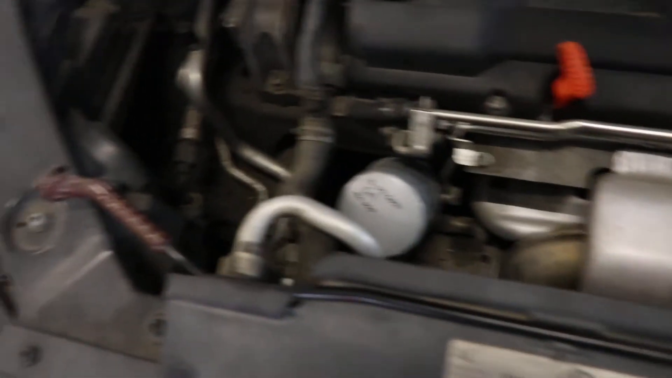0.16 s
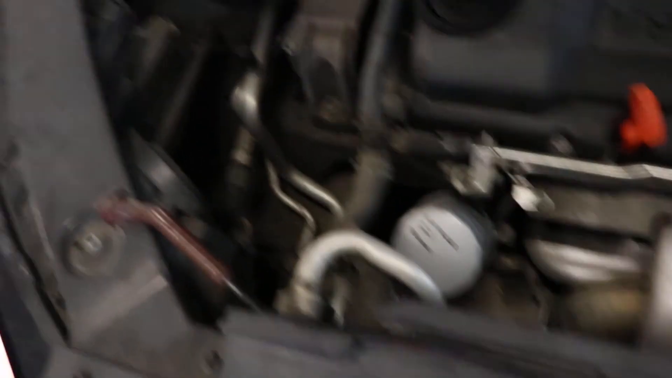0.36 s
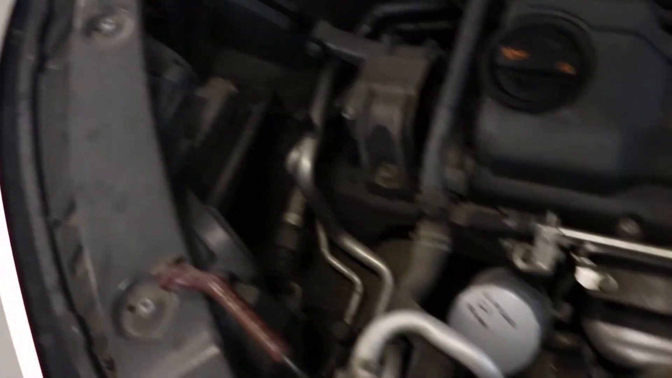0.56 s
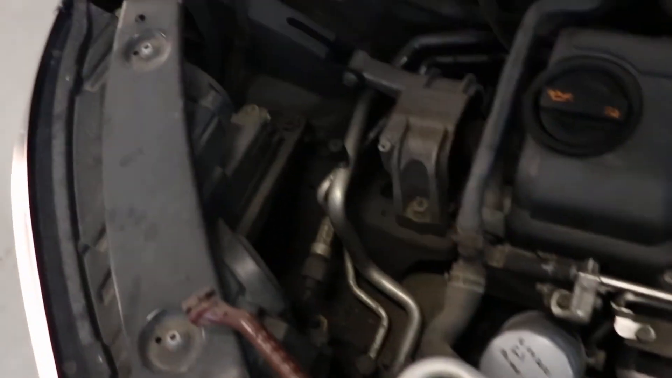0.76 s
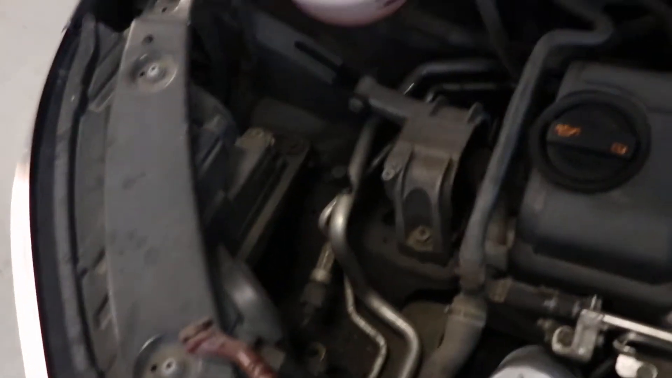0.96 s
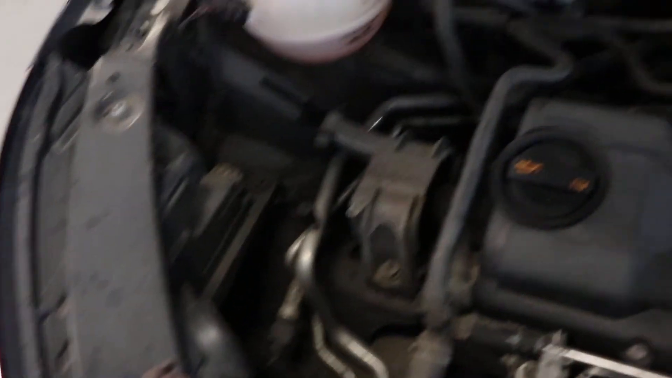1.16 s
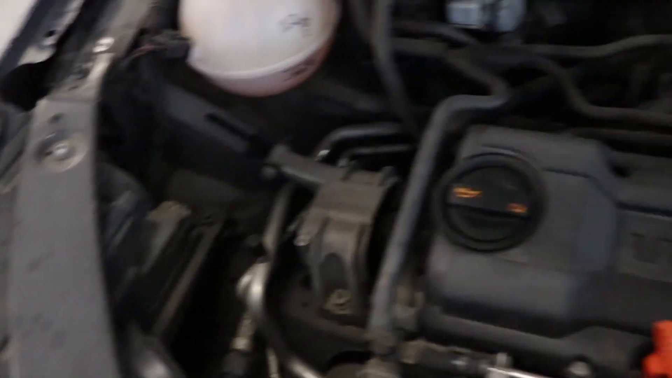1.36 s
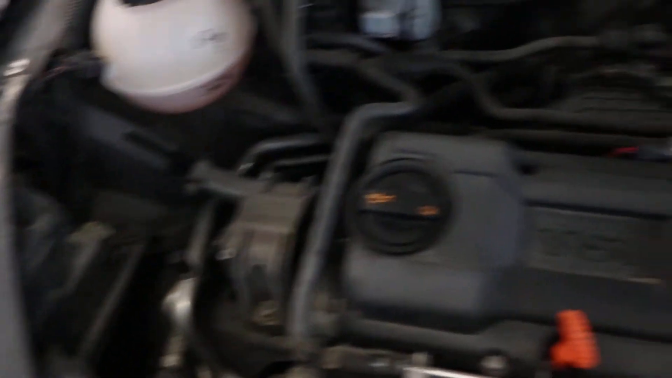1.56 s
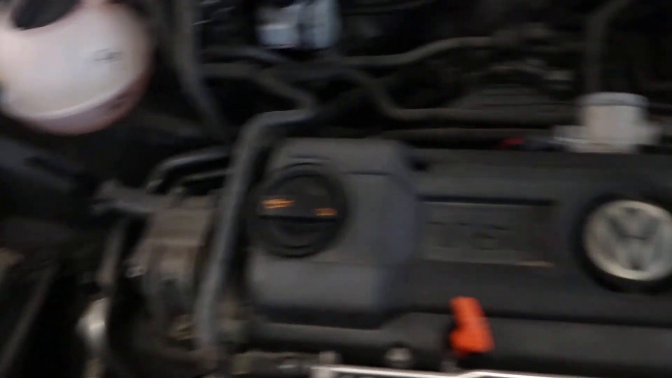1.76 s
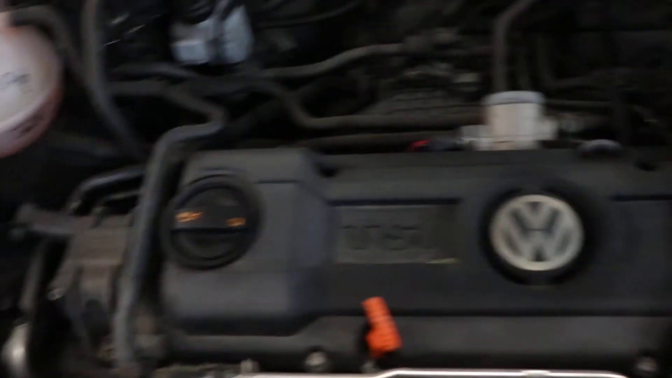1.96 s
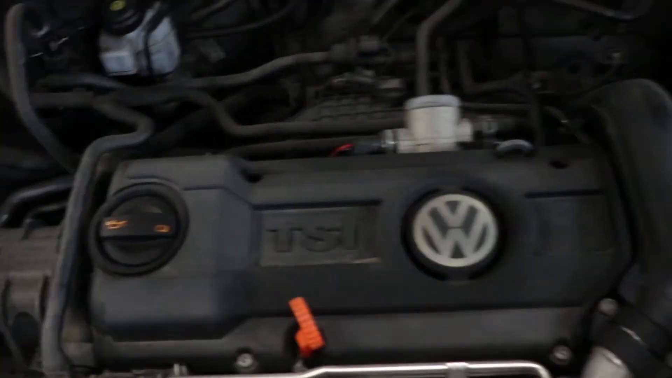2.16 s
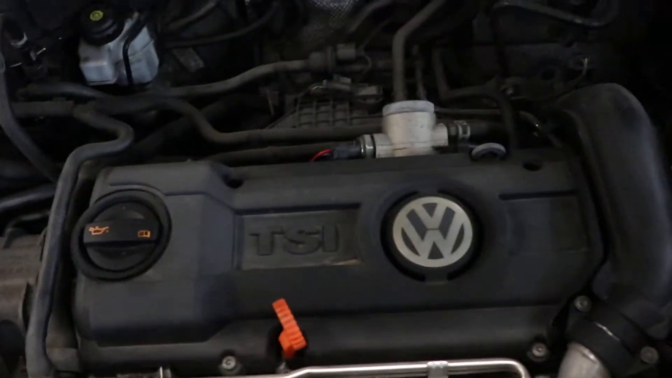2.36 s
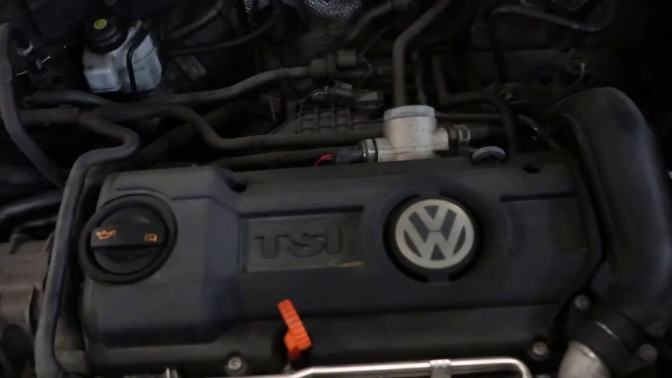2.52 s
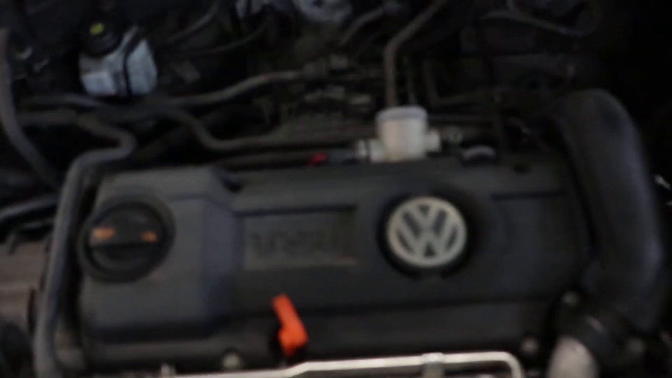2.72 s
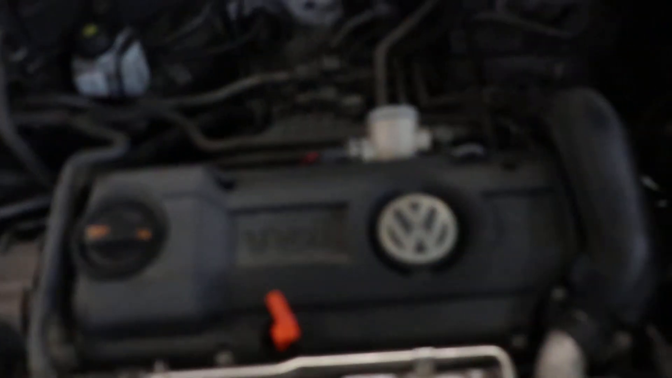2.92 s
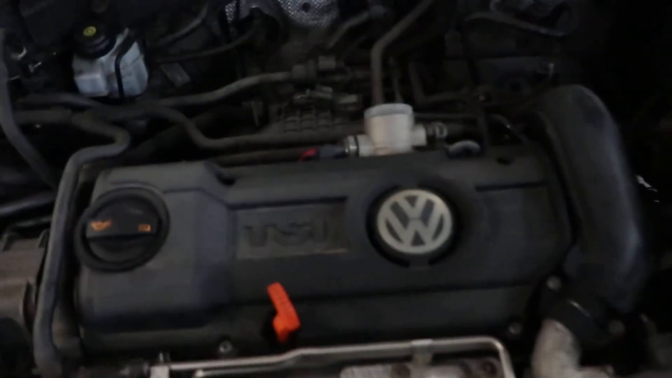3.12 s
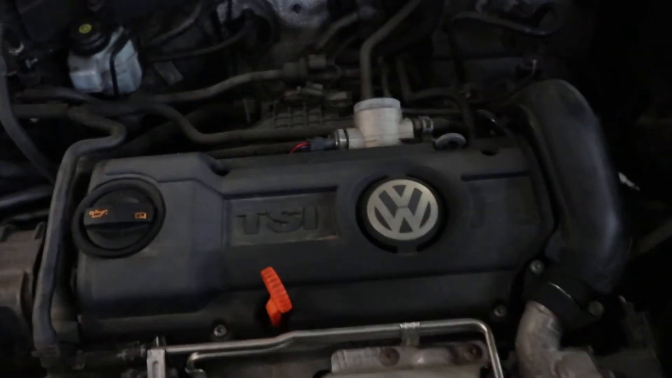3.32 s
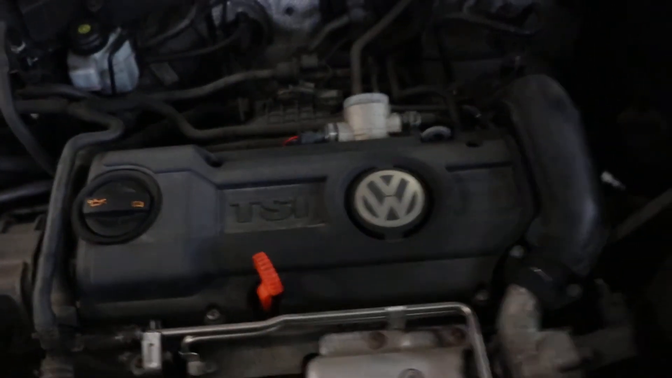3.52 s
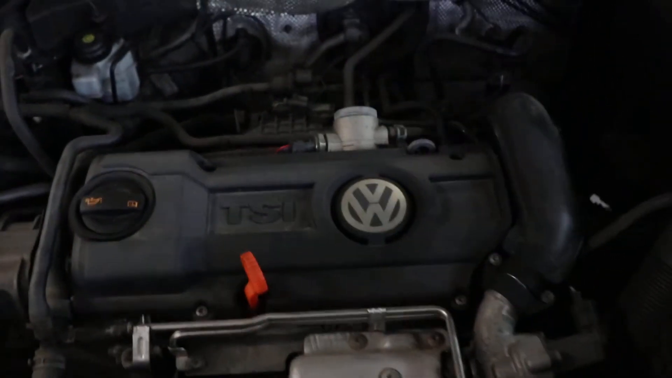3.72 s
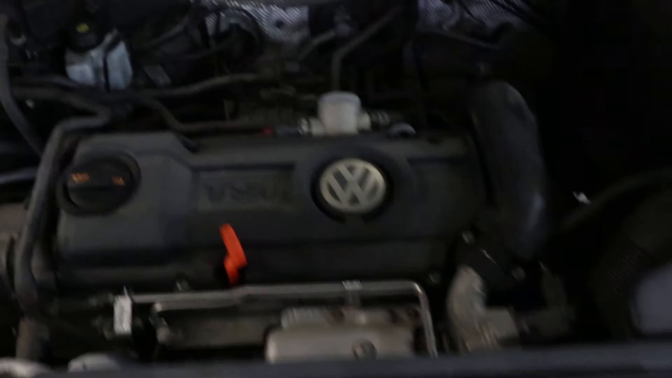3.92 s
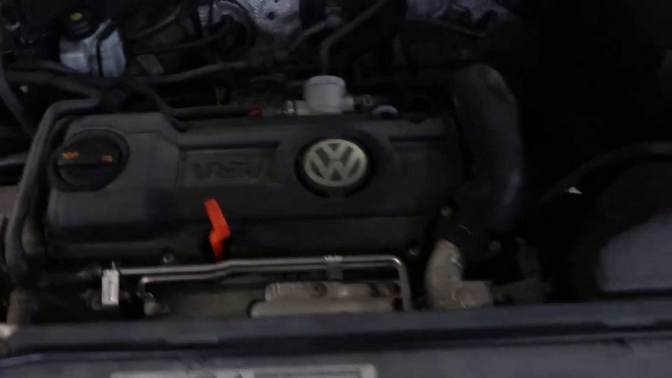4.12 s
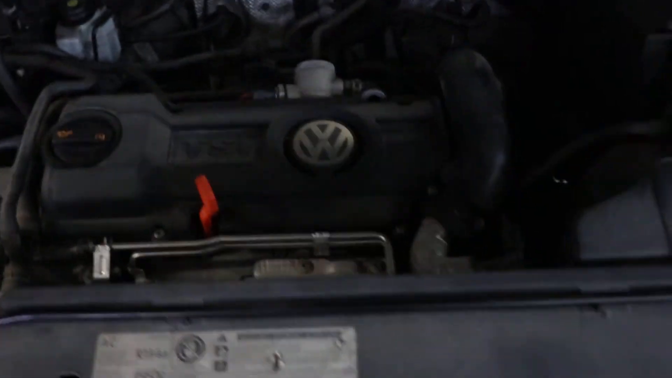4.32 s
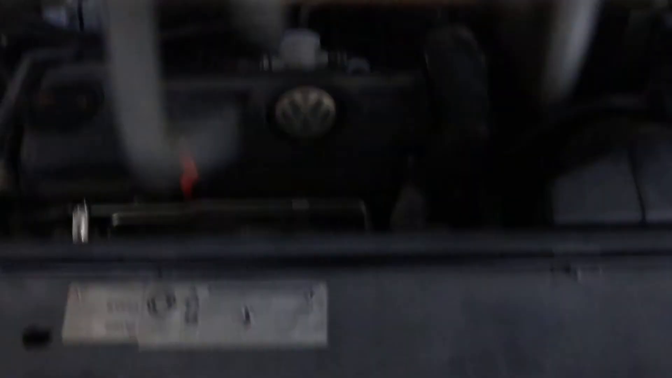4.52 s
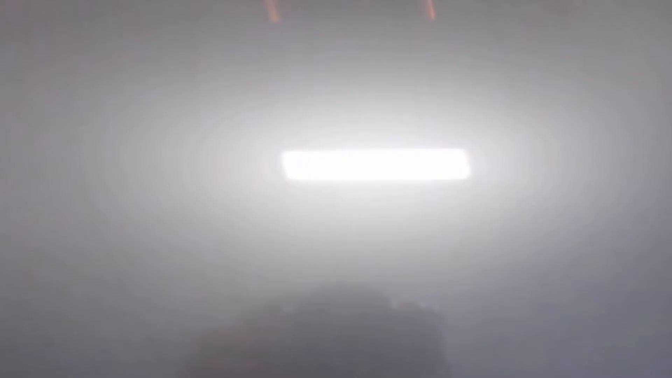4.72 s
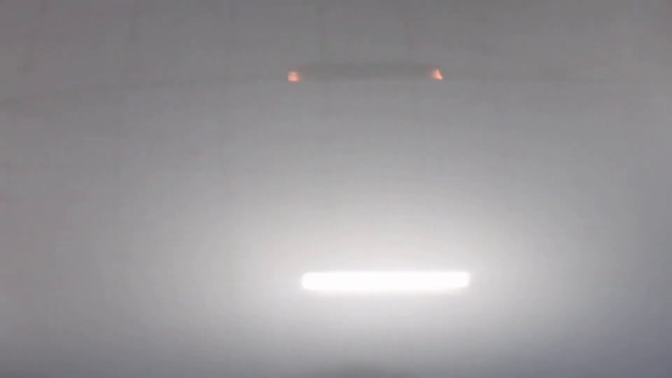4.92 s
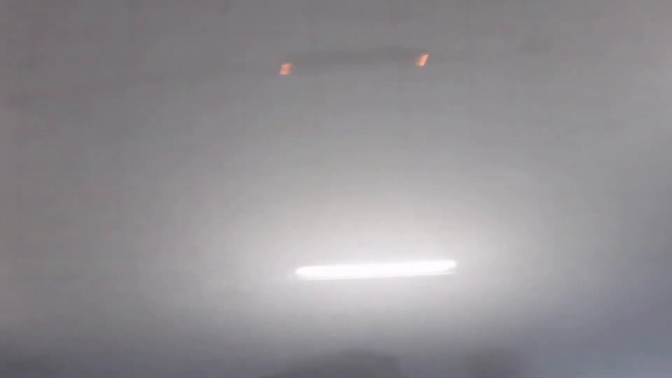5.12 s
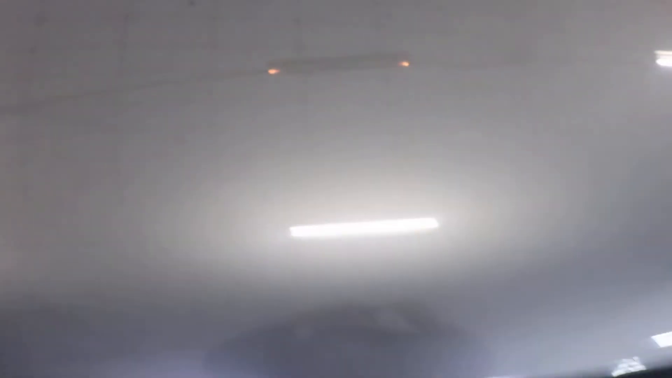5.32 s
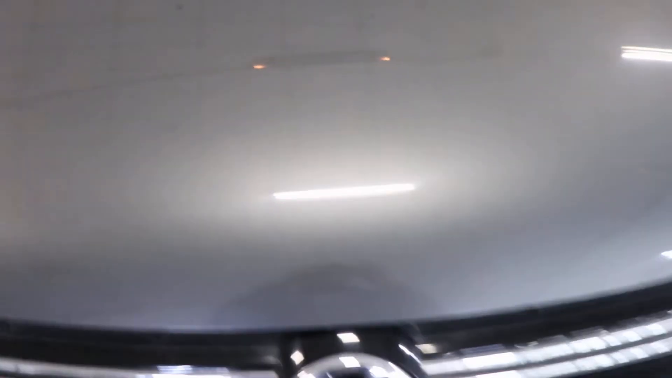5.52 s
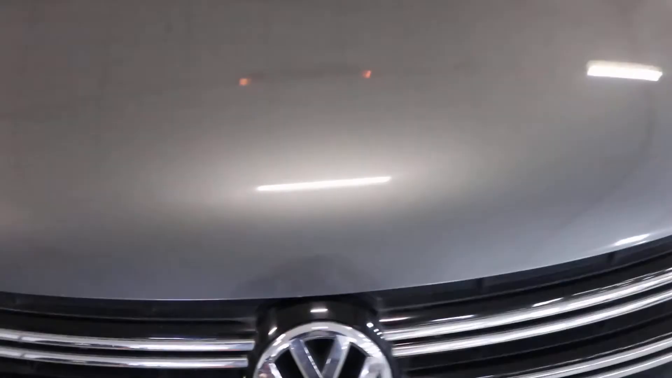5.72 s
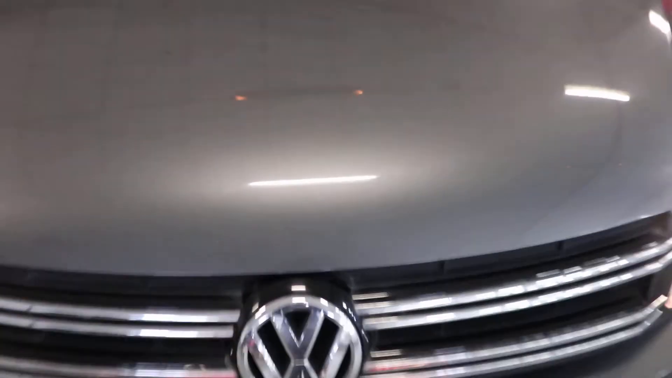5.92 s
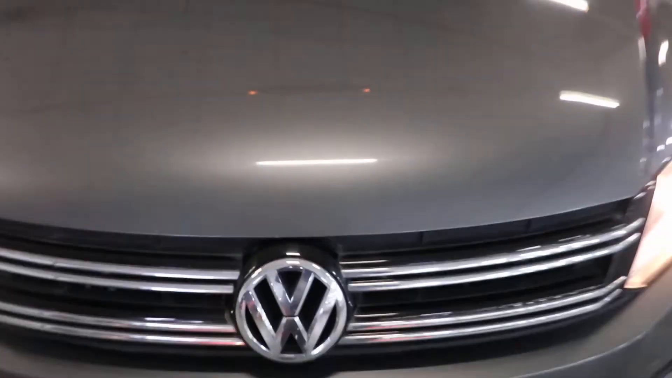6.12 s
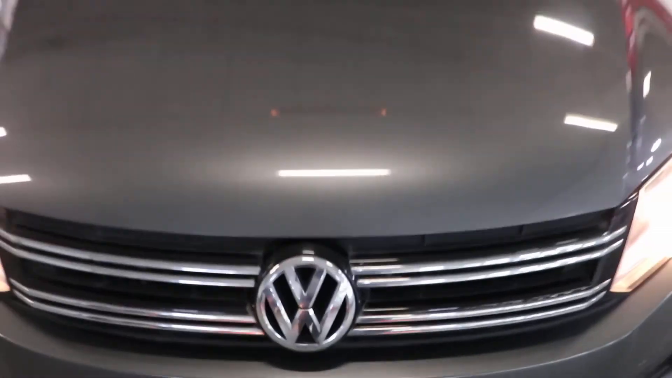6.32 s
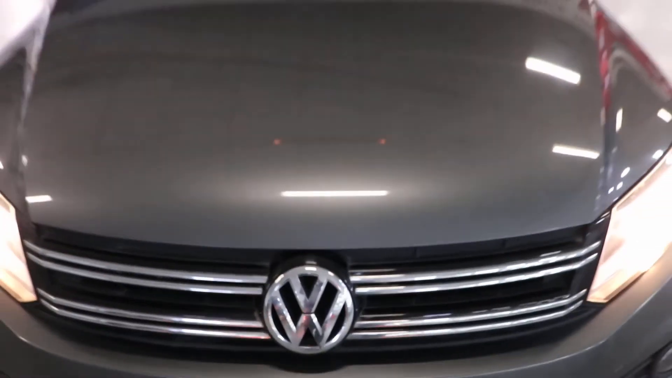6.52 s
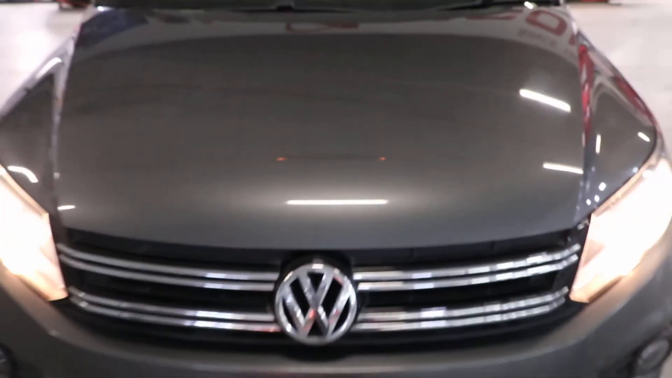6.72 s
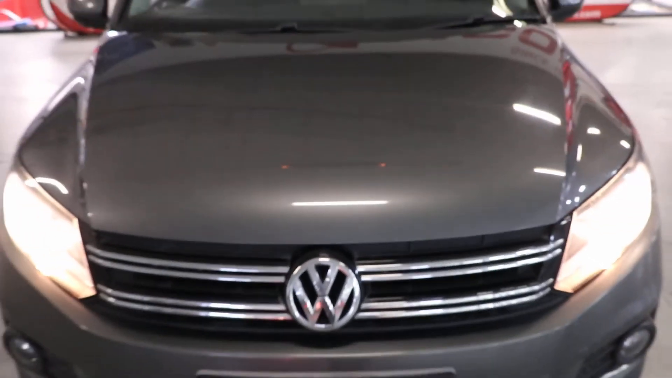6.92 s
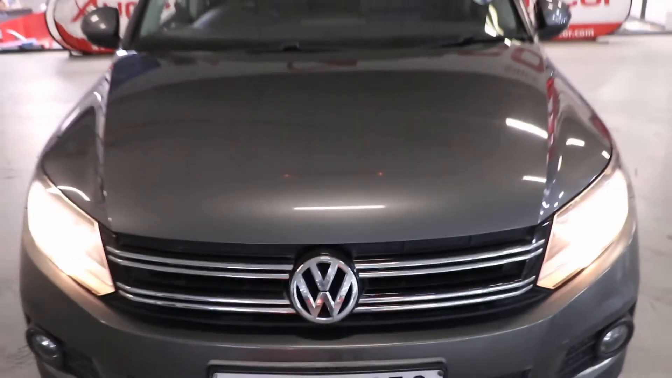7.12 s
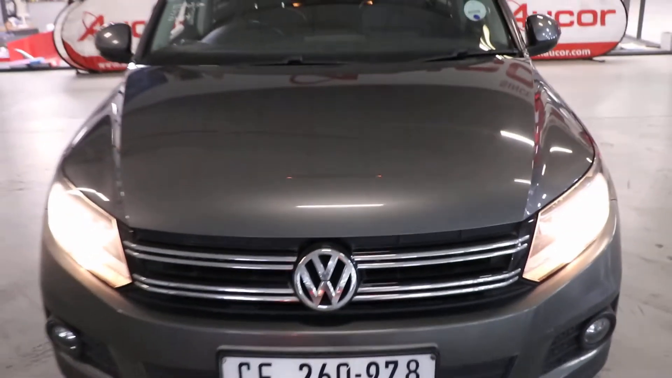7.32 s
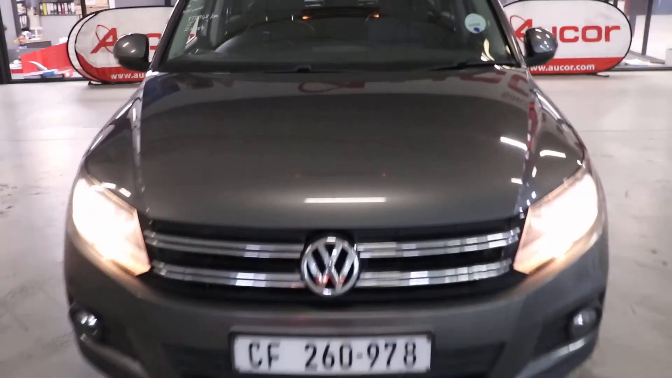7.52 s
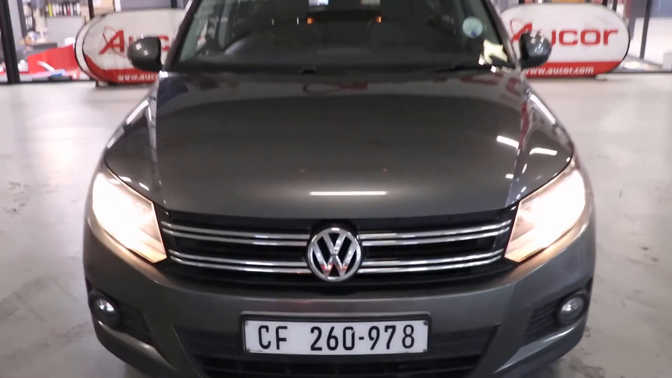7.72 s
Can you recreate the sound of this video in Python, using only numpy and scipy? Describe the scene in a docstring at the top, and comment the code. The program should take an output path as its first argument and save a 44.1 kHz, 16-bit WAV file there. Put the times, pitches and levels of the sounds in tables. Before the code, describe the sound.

Rattly car engine and beating fans heard over the open bay, cut off by a booming bonnet slam into a quieter indoor hum.

```python
"""A four-cylinder petrol engine idles fast in a showroom, heard from just over the open engine bay.
Shaped noise pulses with its firings, cam cover modes and a tappet ring, and injector pulses brighten the hiss.
Harmonics make two beating fan drones and the alternator's whine. Blows on modes slam the bonnet; the camera's
gain control ducks and creeps back up on the muffled engine, until a sharp click on the camera knocks it down."""
import sys
import numpy as np
from scipy import signal
from scipy.fft import rfft, irfft, next_fast_len
from scipy.io import wavfile

SR = 44100
rng = np.random.default_rng(int(sys.argv[2]) if len(sys.argv) > 2 else 0)


def master(y):
    """Save y as 16-bit WAV."""
    cut = np.clip(np.atleast_2d(y).T, -1, 1)
    pcm = np.round(cut * 32767)  # scale
    wavfile.write(sys.argv[1], SR, pcm.astype(np.int16))


N = 347507
TIME = np.arange(N) / SR

# engine speed: (time [s], firing rate [1/s])
ENGINE_SPEED = [(0, 33.22), (.9, 33.28), (1.7, 33.42), (2.4, 33.32), (3.0, 33.22), (3.5, 33.11),
                (4.2, 33.19), (4.7, 33.3), (6.5, 33.3), (7.88, 33.4)]
# noise zones of the bay, rumble, air rush, clatter, rasp, hiss: centre [Hz]
BAY_ZONE_CENTRES = [90, 400, 1500, 4200, 9500]
# noise spectrum of the open bay before the gain of each zone: (frequency [Hz], density [dB per Hz])
BAY_SPECTRUM = [(14, -67), (28, -54), (45, -61), (90, -50), (240, -48.5), (315, -46), (430, -49.5),
                (900, -54), (1750, -57), (2500, -62), (3900, -66.5), (4500, -70), (6500, -76), (7800, -84),
                (8600, -81.5), (9700, -87.5), (11000, -86), (14500, -110)]
# stereo width of diffuse sound: (frequency [Hz], side minus mid [dB])
STEREO_WIDTH = [(60, -33), (110, -32), (200, -23), (380, -16), (690, -13), (1280, -9.5), (2370, -5),
                (4360, 1), (8050, 7.5), (14800, 10.5)]
# valve train contacts in every firing: (share of the firing period [1], relative level [dB])
VALVE_CONTACTS = [(.8, -5.5), (1, 0), (.11, -9), (.24, -6), (.5, -9.5)]
STRIKE_JITTER_S, STRIKE_UNEVEN_DB = .0004, 0.7
# cam cover modes: (frequency [Hz], relative level [dB], t60 [s])
COVER_MODES = [(668, -37.5, 0.055), (906, -46, 0.04), (1050, -43, .025), (1256, -42.5, 0.013),
               (1400, -34, 0.027), (1660, -42, 0.015), (1880, -41.5, 0.019), (2860, -43.5, 0.016),
               (3600, -44, 0.014), (3890, -46, .02)]

# tappet knock: (time [s], level [dB])
KNOCK_LEVEL = [(0, -1.5), (1.1, -1.5), (1.45, -7), (1.9, 2), (3.1, -1), (3.95, 2), (4.05, 5), (4.15, 7.5),
               (4.19, -4), (4.6, -10), (4.98, -12), (5.05, -26)]
# tappet ring: (frequency [Hz], relative level [dB])
TAPPET_MODES = [(1830, -21.5), (2850, -32.5), (3600, -31)]
# strength of the knock at each cylinder in turn: relative level [dB]
CYLINDER_STRENGTH = [-1, -0.12, 2.2, -1.5]
KNOCK_AT = .83  # share of the firing period
KNOCK_RISE_S, KNOCK_UNEVEN_DB, KNOCK_PITCH_SPREAD = .0012, 1.3, .025  # pitch spread as a fraction

# speeds of the slow and the fast fan: (time [s], rotation rate [1/s])
SLOW_FAN_SPEED = [(0, 41.56), (3.6, 41.52), (4.9, 41.45), (6.2, 41.46), (7.0, 41.4), (7.88, 41.2)]
QUICK_FAN_SPEED = [(0, 47.93), (3.6, 47.91), (4.9, 47.78), (6.2, 47.62), (7.0, 47.78), (7.88, 47.9)]
# harmonics of the two seven-bladed fans and of the firing hum: (multiple of the rate [1], relative level [dB])
SLOW_FAN_ORDERS = [(2, -29), (3, -14.5), (5, -12.5), (7, 0.5), (10, -25), (11, -17), (12, -21), (14, -16.5),
                   (17, -22), (19, -18.5)]
FAST_FAN_ORDERS = [(3, -17), (5, -22.5), (7, 0), (9, -24), (10, -16.5), (11, -13), (14, -17.5), (19, -24.5),
                   (21, -25), (29, -20)]
FIRING_ORDERS = [(1, -49), (2, -46), (6, -41), (8, -51), (9, -33), (10, -31)]
# left minus right level of the tones, heard from the belt side
SIDE_BALANCE_DB = -2.0
# alternator whine: (harmonic [1], level at the belt side [dB], gain across the bay [dB],
# gain over the cover [dB], level when shut [dB], gain at the grille [dB])
WHINE_HARMONICS = [(1, -30, -6.5, 3.5, -33, 1.5), (2, -46, 7, 6, -42, 4), (3, -48.5, 8, -3, -43.5, 0.5),
                   (4, -48.5, 8, 1, -45.5, -1.5)]
# swells of each whine harmonic in the standing waves of bay and hall: (time [s], level [dB])
STANDING_SWELLS = [
    [(2.3, 2.5), (3.9, -1), (5.0, -3), (5.75, -3), (6.25, 6.5), (6.5, 1), (6.66, -8), (6.85, 4),
     (7.15, 6.5), (7.42, 0), (7.62, -11), (7.82, 1.5)],
    [(2.0, 0), (2.8, -5), (3.45, 1), (4.1, -5), (4.6, 2), (5.5, 0), (5.85, 4), (6.25, 1.5), (6.55, -6),
     (6.76, 3), (6.87, -5), (7.03, 5), (7.5, 1), (7.85, -1.5)],
    [(2.9, -1), (4.1, 3), (4.7, -6), (5.0, 6), (5.5, -8), (5.7, 3), (5.95, -12), (6.2, -2), (6.48, 9),
     (6.6, -4), (6.72, 7), (6.92, -9), (7.22, 5), (7.45, -5)],
    [(3.5, 3), (4.2, 0), (5.0, 1), (6.15, -1.5), (6.35, 5), (6.7, -2), (7.15, 0.5), (7.7, 1), (7.85, 9.5)],
]
WHINE_PER_FIRING = 16.71  # whine fundamental over firing rate
# thin whistle: (time [s], pitch [Hz])
WHISTLE_PITCH = [(0, 5600), (2.3, 5630), (3.6, 5685), (4.6, 5685), (6.8, 5665), (7.15, 5710), (7.5, 5675),
                 (7.88, 5650)]
# spurts of the whistle while the bonnet falls: (time [s], level [dB])
SPURT_LEVEL = [(4.43, 0), (4.48, 9), (4.56, 2), (4.6, -7), (4.665, 8), (4.695, -5), (4.735, 7), (4.8, 1),
               (4.88, 5), (4.96, 11), (5.05, 0)]
# fan hum through the grille: (time [s], level [dB])
GRILLE_LEVEL = [(0, -75), (6.3, -62), (6.8, -43), (7.3, -38.5), (7.6, -36.5), (7.88, -46)]

# place of the camera, 0 at the belt side to 1 in front of the fans: (time [s], place [1])
CAMERA_PLACE = [(0, 0.87), (.4, 0.26), (.8, 0.038), (1.3, 0.27), (2.2, 0.78), (3.5, 0.5), (4.0, 1)]
OVER_COVER_S, HOVER_S = 3.08, 1  # hovering over the cam cover
LOWER_S, LOWERING_TAKES_S = 4.376, 0.33  # the bonnet swings down between engine and camera
SHUT_S, SEALING_TAKES_S = 4.98, .07  # then it seals
BACK_AWAY_S, BACKING_TAKES_S = 6.26, 0.7  # the camera backs away until the grille faces it

# latch strikes and bonnet landing:
# (time [s], level [dB], pitch above which the contact is soft [Hz], rattle relative to the blow [dB])
LATCH_BLOWS = [(4.9777, 12, 9000, -6.5), (4.9832, 12, 700, -20), (4.9858, 8, 600, -18),
               (4.9937, 10, 1500, -9), (4.9957, 10.5, 1500, -11), (5.0025, -9, 9000, -4),
               (5.0052, 1.5, 5000, -6), (5.0085, 11, 900, -8)]
BONNET_BLOWS = [(5.0075, 27.5, 1500, -19)]
# modes of the latch, then the bonnet's dead thud and ringing panel: (frequency [Hz], relative level [dB], t60 [s])
LATCH_MODES = [(306, -10, 0.068), (496, -18, .05), (630, -7.5, 0.067), (760, -4.5, .05), (930, -2.5, 0.033),
               (1180, 3.5, 0.022), (1266, -7, 0.023), (1410, -2.5, 0.024), (1620, -5, .03),
               (1900, -15, 0.016), (2720, -34, 0.026), (3360, -21, 0.015)]
BONNET_MODES = [(71, -4.5, 0.045), (121, -6, 0.038), (167, -23, 0.22), (264, -20.5, 0.2), (381, -29, 0.2),
                (477, -42, 0.2), (640, -42, 0.2)]
SEAL_CUT_HZ = 610  # the rubber seals soften the bonnet's blow above this pitch
# decay of the showroom: (frequency [Hz], t60 [s])
SHOWROOM_DECAY = [(60, 0.68), (250, 1.0), (1000, 0.3), (4000, 0.26), (12000, 0.089)]

# clicks on the camera body: (time [s], level [dB], ring [Hz], rise [s])
BODY_CLICKS = [(5.412, -23, 4200, .0003), (5.45, -28, 4000, .0003), (5.5517, -18, 4250, .001),
               (5.5801, -20, 5000, .0002), (5.6005, -18, 3500, .001), (5.7892, -13, 4500, 0.00016),
               (7.3476, 9.5, 4450, 0.00027), (7.349, -13, 4370, .0013), (7.3494, -13, 420, 0.00081)]
# overtones of the camera's shell: (multiple of the ring pitch [1], relative level [dB])
SHELL_OVERTONES = [(1, 0), (1.35, -15), (1.92, -18), (2.88, -26)]
BRUSH_S, BRUSH_TAKES_S = 5.54, .1  # fingers brush the camera
CUTOFF_HZ = 16000


def engine_noise(firings):
    """Amplitude modulation: valve pulses make air, clatter and rasp throb; injector pulses tick in rasp and hiss."""
    valves = strokes(firings, delay=.77, rise=0.15, uneven_db=1.3)
    injectors = strokes(firings, delay=0.14, rise=0.06, uneven_db=1.2)

    rumble = heard(open_db=-0.5, across_db=1.0, cover_db=1, lowered_db=-2.0, shut_db=-8.0, grille_db=3.0)
    rumble = rumble * bay_noise(0, direct=0.45)

    air = heard(open_db=.5, across_db=-2.0, cover_db=1.4, lowered_db=0.0, shut_db=-8.5, grille_db=-1.0)
    air = air * rms_one(1 + 0.088 * valves) * bay_noise(1, direct=.6)

    clatter_gain = heard(open_db=-1.2, across_db=0.44, cover_db=1.0, lowered_db=-3.5, shut_db=-7.5, grille_db=1.0)
    clatter_noise = from_db(-1.0) * rms_one(1 + 0.12 * valves) * bay_noise(2, direct=.4)
    clatter = clatter_gain * (clatter_noise + cover_rings(firings))

    rasp = heard(open_db=1, across_db=0.3, lowered_db=-5.5, shut_db=-9.5, grille_db=2.5)
    rasp = rasp * rms_one(1 + 0.085 * valves + 0.19 * injectors) * bay_noise(3, direct=0.17)

    hiss = heard(open_db=-6.0, across_db=7.5, cover_db=1.5, lowered_db=-25, shut_db=-21.0, grille_db=-2)
    hiss = hiss * rms_one(1 + 0.37 * injectors) * bay_noise(4, direct=.1)
    return rumble + air + clatter + rasp + hiss


def bay_noise(zone, direct):
    """Spectral shaping and interaural phase: the direct share of one noise zone leads at the right microphone."""
    size = next_fast_len(N)
    hz = np.arange(size // 2 + 1) * SR / size
    share = at_hz([(f, k == zone) for k, f in enumerate(BAY_ZONE_CENTRES)], hz)
    colour = from_db(at_hz(BAY_SPECTRUM, hz)) * np.sqrt(share * SR / 2)
    mid, scattered = rfft(rng.standard_normal((2, size))) * colour
    direct = np.clip(direct, 0, 1)
    # a side signal in quadrature with the mid delays the left in phase
    side = np.sqrt(1 - direct ** 2) * scattered - 1j * direct * mid
    side = from_db(at_hz(STEREO_WIDTH, hz)) * side
    return irfft(np.array([mid + side, mid - side]), size)[:, :N]


def strokes(firings, delay, rise, uneven_db):
    """Periodic excitation: one uneven pulse per firing; delay and rise are shares of the firing period."""
    turn = firings - delay + 1
    strength = from_db(uneven_db * rng.standard_normal(int(turn[-1]) + 1))
    age = turn % 1 / rise
    return strength[turn.astype(int)] * age * np.exp(1 - age)


def cover_rings(firings):
    """Modal excitation: valve contacts tap the cam cover in fixed order; right above it the low modes gain."""
    count = np.arange(int(firings[-1]))
    strike_s = np.concatenate([np.interp(count + share, firings, TIME) for share, _ in VALVE_CONTACTS])
    strike_db = np.repeat([db for _, db in VALVE_CONTACTS], len(count))
    strikes = len(strike_s)
    rings = 0
    for hz, db, t60 in COVER_MODES:
        # every mode takes the taps a little differently
        taps = np.zeros(N)
        tap_s = strike_s + STRIKE_JITTER_S * rng.standard_normal(strikes)
        at = np.clip((tap_s * SR).astype(int), 0, N - 1)
        tap_db = strike_db + STRIKE_UNEVEN_DB * rng.standard_normal(strikes)
        taps[at] = from_db(tap_db) * rng.choice([-1, 1], strikes)
        lean_db = -2.5 + 3.9 * swell(OVER_COVER_S, HOVER_S)
        if hz >= 1550:
            lean_db = -lean_db
        rings = rings + from_db(db + lean_db) * rms_one(ring(taps, hz, t60))
    gain = heard(open_db=1.0, across_db=1.3, cover_db=1.3, lowered_db=-13.0, shut_db=-15.0)
    return two_ports(gain * rings, lag_s=.00007)


def tappet_knock(firings):
    """Damped resonance: a dry tick in every firing, uneven between cylinders and never quite at the same pitch."""
    out = np.zeros(N + SR)
    chances = rng.standard_normal((int(firings[-1]), 1 + len(TAPPET_MODES)))
    for k, chance in enumerate(chances):
        at = round(np.interp(k + KNOCK_AT, firings, TIME) * SR)
        tick = 0
        for (hz, db), detune in zip(TAPPET_MODES, chance[1:]):
            pitch = hz * (1 + KNOCK_PITCH_SPREAD * detune)
            tick = tick + from_db(db) * ping(.02, KNOCK_RISE_S, pitch)
        strength_db = CYLINDER_STRENGTH[k % len(CYLINDER_STRENGTH)] + KNOCK_UNEVEN_DB * chance[0]
        out[at:at + len(tick)] += from_db(strength_db) * tick
    return two_ports(from_db(in_time(KNOCK_LEVEL)) * out[:N], lag_s=.00006)


def ping(length_s, rise_s, hz):
    """Critically damped envelope: a sine swells quickly and dies away."""
    t = TIME[:int(length_s * SR)]
    return t / rise_s * np.exp(1 - t / rise_s) * np.sin(2 * np.pi * hz * t)


def engine_tones(firings):
    """Beating: the blade tones of two unequal fans interfere over the firing hum and the alternator's whine."""
    slow = heard(open_db=-28.0, across_db=5.5, lowered_db=1.5, shut_db=-31, grille_db=-2)
    slow = slow * from_db(-8 * swell(peak_s=7.6, width_s=0.24))  # a quiet spot in front of the car
    slow = slow * standing_wave(node_s=7.53, spacing_s=1.13, echo=.5 * ramp(SHUT_S, SEALING_TAKES_S))
    slow_turns = turns_of(in_time(SLOW_FAN_SPEED))
    slow = slow * rotor(slow_turns, SLOW_FAN_ORDERS, waver_db=1.1, waver_rate=9, jitter=0.18)

    fast = heard(open_db=-20.5, across_db=-0.4, lowered_db=-0.9, shut_db=-31.5, grille_db=-4.0)
    fast = fast * standing_wave(node_s=0.89, spacing_s=2.6, echo=0.19)
    fast_turns = turns_of(in_time(QUICK_FAN_SPEED))
    fast = fast * rotor(fast_turns, FAST_FAN_ORDERS, waver_db=0.5, waver_rate=14, jitter=0.09)

    hum = heard(open_db=-1.5, shut_db=-6.5)
    hum = hum * rotor(firings, FIRING_ORDERS, waver_db=3.0, waver_rate=5.6, jitter=0.32)

    balance_db = SIDE_BALANCE_DB * (1 - ramp(start_s=0.39, length_s=1.3))
    tones = two_ports(slow + fast + hum + whine(firings), lag_s=.00007)
    return tones * from_db([balance_db / 2, -balance_db / 2])


def rotor(turns, orders, waver_db, waver_rate, jitter):
    """Fourier series: harmonics of a turning part, each wavering in level and phase (jitter in radians)."""
    out = 0
    for multiple, db in orders:
        phase = 2 * np.pi * (round(multiple) * turns + rng.random()) + jitter * drift(4.1)
        level = from_db(db + waver_db * drift(waver_rate))
        out = out + np.sqrt(2) * level * np.sin(phase)
    return out


def whine(firings):
    """Fixed transmission ratio: the belt-driven alternator follows the engine; its tones swell as the camera moves."""
    out = 0
    for harmonic, swells in zip(WHINE_HARMONICS, STANDING_SWELLS):
        k, open_db, across_db, cover_db, shut_db, grille_db = harmonic
        gain = heard(open_db, shut_db, across_db, cover_db, grille_db=grille_db)
        gain = gain * from_db(in_time(swells))
        tone = rotor(WHINE_PER_FIRING * firings, [(k, 0)], waver_db=1.25, waver_rate=10, jitter=.16)
        out = out + gain * tone
    return out


def whistle():
    """Frequency and amplitude modulation: a thin high engine whistle flutters and comes in spurts."""
    phase = 2 * np.pi * turns_of(in_time(WHISTLE_PITCH) + 7 * drift(8))
    flutter = rms_one(1 + .35 * drift(18))
    tone = flutter * np.sqrt(2) * np.sin(phase + 0.5 * drift(30))
    gain = heard(open_db=-55.0, across_db=8.0, shut_db=-49.5, grille_db=0.5) * from_db(in_time(SPURT_LEVEL))
    return two_ports(gain * tone, lag_s=.00005)


def grille_hum():
    """Radiation through an opening: the fast fan's upper harmonics sound out in front of the car."""
    turns = turns_of(in_time(QUICK_FAN_SPEED))
    tones = rotor(turns, [(10, 1), (14, -5)], waver_db=1.0, waver_rate=4, jitter=.3)
    return from_db(in_time(GRILLE_LEVEL)) * tones


def slam():
    """Impact and damping: the latch clanks, then the bonnet booms down on soft seals and its panel shudders."""
    latch = struck(LATCH_BLOWS, LATCH_MODES, rattle_s=0.0071, low_hz=550, high_hz=2550)
    bonnet = struck(BONNET_BLOWS, BONNET_MODES, rattle_s=0.037, low_hz=130, high_hz=600)
    bonnet = band(bonnet, low_hz=60, high_hz=SEAL_CUT_HZ)
    direct = two_ports(latch + bonnet, lag_s=.00004)
    return direct + showroom(from_db(-1.0) * latch + from_db(-2.0) * bonnet)


def struck(hits, modes, rattle_s, low_hz, high_hz):
    """Modal excitation by impact: hard or soft blows ring the main modes and a noisy, quickly dying rattle."""
    blows, shakes = np.zeros((2, N))
    for s, db, soft_hz, rattle_db in hits:
        at = round(s * SR)
        push = np.exp(-2 * np.pi * soft_hz * TIME[:SR // 100])
        blows[at:at + len(push)] += from_db(db) * push / push.sum()
        shakes[at] = from_db(db + rattle_db)
    rings = sum(from_db(db) * ring(blows, hz, t60) for hz, db, t60 in modes)
    # rattle_s is the time constant of the decay
    burst = signal.lfilter([1], [1, -np.exp(-1 / (rattle_s * SR))], shakes + 1e-18)
    return rings + burst * rms_one(band(rng.standard_normal(N), low_hz, high_hz))


def showroom(x):
    """Diffuse reverberation: octaves of decaying noise; the bass is nearly alike at both microphones."""
    t, response = TIME[:int(1.5 * SR)], 0
    for low in 30 * 2 ** np.arange(9):
        hz = low * np.sqrt(2)
        mid, side = band(rng.standard_normal((2, len(t))), low, 2 * low)
        pair = mid + from_db(at_hz(STEREO_WIDTH, hz)) * side * [[1], [-1]]
        response = response + pair * np.exp(-np.log(1000) * t / at_hz(SHOWROOM_DECAY, hz))
    response = response * (1 - np.exp(-t / 0.0089)) / np.sqrt(SR)  # echoes build up gradually
    return signal.fftconvolve(x[None], response, axes=1)[:, :N]


def hall_boom(level_db, t60_s, low_hz, high_hz):
    """Exponential decay: a band of the slam rolls on in the far parts of the hall."""
    dying = np.exp(-np.log(1000) * np.maximum(TIME - SHUT_S, 0) / t60_s)
    dying = ramp(SHUT_S, SEALING_TAKES_S) * dying
    return from_db(level_db) * dying * rms_one(band(rng.standard_normal(N), low_hz, high_hz))


def camera_clicks():
    """Inharmonic partials: short plastic pings right beside the microphones, with a little grit."""
    out = np.zeros(N)
    t = TIME[:SR // 40]
    for s, db, hz, rise in BODY_CLICKS:
        tone = sum(from_db(level_db) * np.sin(2 * np.pi * multiple * hz * t)
                   for multiple, level_db in SHELL_OVERTONES)
        grit = 0.04 * rng.standard_normal(len(t))
        envelope = (t / rise * np.exp(1 - t / rise)) ** 2
        at = round(s * SR)
        out[at:at + len(t)] += from_db(db) * envelope * (tone + grit)
    return two_ports(out, lag_s=.00009)


def handling():
    """Friction noise: the grip rumbles as the camera is carried backwards, and fingers brush its shell once."""
    rumble = rms_one(band(rng.standard_normal(N), 24, 90))
    rumble = from_db(-37.5) * ramp(start_s=5.6, length_s=0.89) * rumble
    rub = rms_one(band(rng.standard_normal(N), 7000, 9400))
    rub = from_db(-52 + 2.5 * drift(40)) * swell(BRUSH_S, BRUSH_TAKES_S) * rub
    return rumble + rub


def heard(open_db, shut_db, across_db=0, cover_db=0, lowered_db=0, grille_db=0):
    """Distance and insertion loss: gain follows the camera, then the falling bonnet shades and shuts in the source."""
    in_view = open_db + across_db * in_time(CAMERA_PLACE) + cover_db * swell(OVER_COVER_S, HOVER_S)
    in_view = in_view + lowered_db * ramp(LOWER_S, LOWERING_TAKES_S)
    enclosed = shut_db + grille_db * ramp(BACK_AWAY_S, BACKING_TAKES_S)
    shut = ramp(SHUT_S, SEALING_TAKES_S)
    return from_db((1 - shut) * in_view + shut * enclosed)


def standing_wave(node_s, spacing_s, echo):
    """Interference: a tone meets its own echo, and the moving camera passes a node at even intervals."""
    return np.abs(1 - np.clip(echo, 0, .9) * np.exp(2j * np.pi * (TIME - node_s) / spacing_s))


def two_ports(x, lag_s):
    """Interaural time difference: the left microphone hears the sound a little after the right."""
    return np.array([np.interp(TIME - lag_s, TIME, x), x])


def ring(clicks, hz, t60):
    """Damped oscillator: a unit click sets a decaying sine of initial height 1 ringing."""
    r, w = np.exp(-np.log(1000) / (t60 * SR)), 2 * np.pi * hz / SR
    return signal.lfilter([0, np.sin(w)], [1, -2 * r * np.cos(w), r * r], clicks + 1e-18)


def band(x, low_hz, high_hz):
    """Band-pass filtering: keeps the pitches between two limits."""
    limits = [low_hz, min(high_hz, .45 * SR)]
    return signal.sosfilt(signal.butter(2, limits, "band", fs=SR, output="sos"), x)


def drift(rate):
    """Low-passed noise: a smooth random course of rms 1 that changes about rate times a second."""
    # drawn at every 40th sample, after a run-in of 2000 steps
    r = np.exp(-80 * np.pi * rate / SR)
    slow = signal.lfilter([1], [1, -2 * r, r * r], rng.standard_normal(N // 40 + 2002))[2000:]
    return np.interp(np.arange(N) / 40, np.arange(len(slow)), rms_one(slow))


def turns_of(rate):
    """Phase as the integral of frequency, in turns."""
    return np.cumsum(rate) / SR


def ramp(start_s, length_s):
    """Linear transition: rises evenly from 0 to 1 and stays there."""
    return np.clip((TIME - start_s) / length_s, 0, 1)


def swell(peak_s, width_s):
    """Gaussian envelope: rises smoothly to 1 and falls back."""
    return np.exp(-((TIME - peak_s) / width_s) ** 2)


def in_time(rows):
    """Linear interpolation: a curve table at every sample."""
    s, value = np.transpose(rows)
    return np.interp(TIME, s, value)


def at_hz(points, hz):
    """Logarithmic pitch scale: a spectrum read between its points."""
    f, value = np.transpose(points)
    return np.interp(np.log(hz + 0.00089), np.log(f), value)


def from_db(db):
    """Decibel law: amplitude ratio of a level."""
    return 10 ** (np.asarray(db) / 20)


def rms_one(x):
    """Effective value: scales a signal to rms 1."""
    return x / np.sqrt(np.mean(x ** 2) + 1e-20)


def scene():
    """Superposition: engine, slam, hall, clicks and handling add."""
    firings = turns_of(in_time(ENGINE_SPEED))
    engine = engine_noise(firings) + tappet_knock(firings) + engine_tones(firings) + whistle() + grille_hum()
    echo = hall_boom(level_db=-15.5, t60_s=2.45, low_hz=58, high_hz=176)
    echo = echo + hall_boom(level_db=-15.0, t60_s=3.0, low_hz=210, high_hz=420)
    echo = echo + hall_boom(level_db=-24, t60_s=2.2, low_hz=700, high_hz=1050)
    return engine + slam() + echo + camera_clicks() + handling()


def gain_control(x, threshold_db, range_db, attack_s, release_db_per_s):
    """Compression: peaks over the threshold pull the gain down quickly, within a range; it creeps back steadily."""
    peak_db = 20 * np.log10(np.abs(x).max(axis=0) + 1e-9)
    excess = np.clip(peak_db - threshold_db, 0, range_db)
    recovery = release_db_per_s * TIME
    held = np.maximum.accumulate(excess + recovery) - recovery
    r = np.exp(-1 / (attack_s * SR))
    return x * from_db(-signal.lfilter([1 - r], [1, -r], held))


def record(dry):
    """Compression, saturation towards full scale, and a low-pass that cuts the top off."""
    levelled = gain_control(dry, threshold_db=2.5, range_db=20.5, attack_s=0.0063, release_db_per_s=7.0)
    clipped = levelled / (1 + levelled ** 4) ** (1 / 4)
    return signal.sosfilt(signal.cheby2(12, 60, CUTOFF_HZ, fs=SR, output="sos"), clipped)


dry = scene()
out = record(dry)
master(out)
```